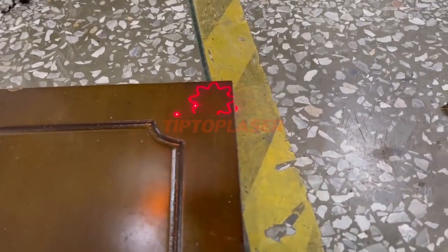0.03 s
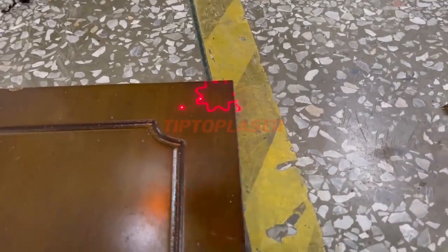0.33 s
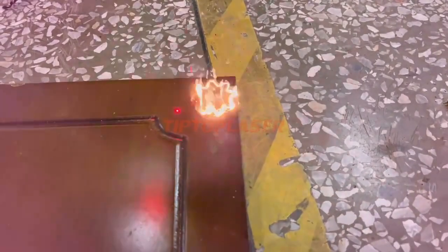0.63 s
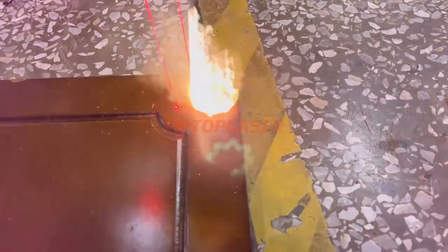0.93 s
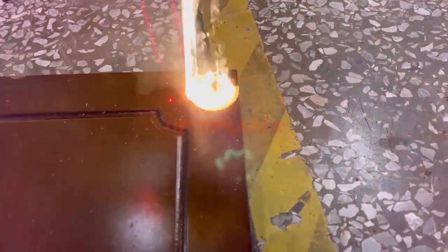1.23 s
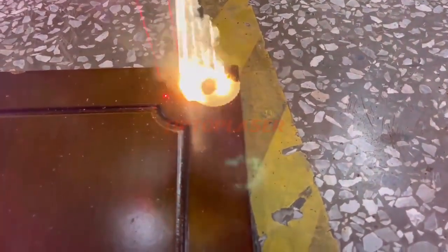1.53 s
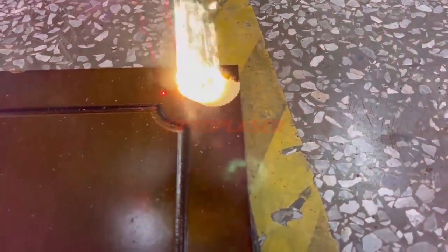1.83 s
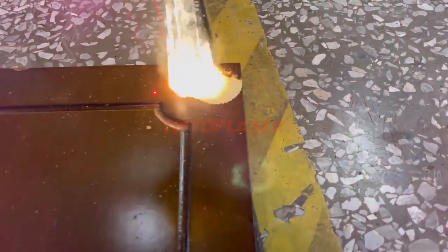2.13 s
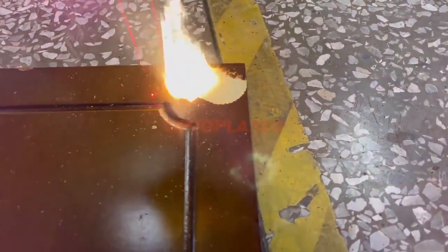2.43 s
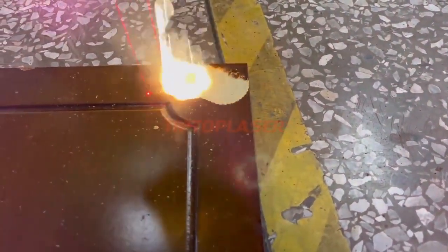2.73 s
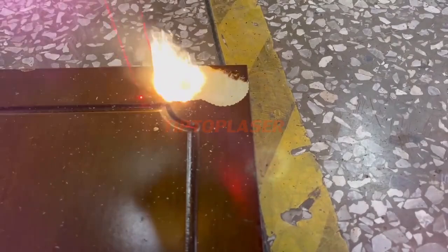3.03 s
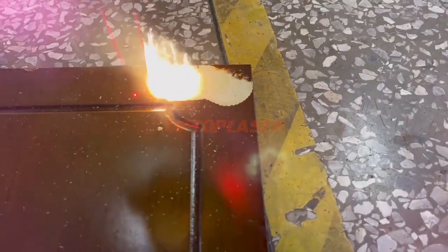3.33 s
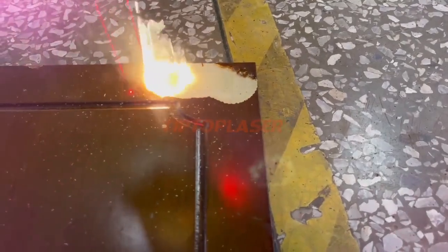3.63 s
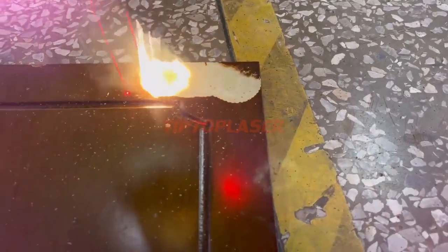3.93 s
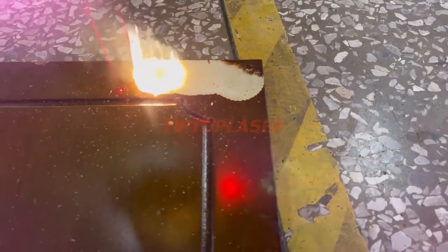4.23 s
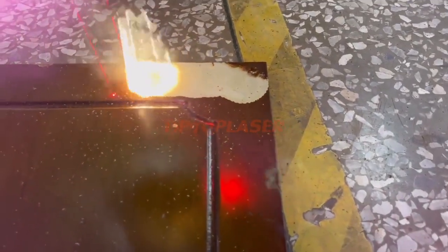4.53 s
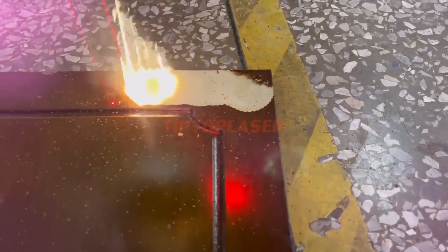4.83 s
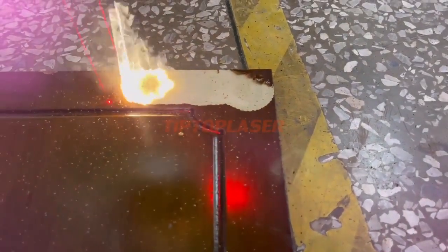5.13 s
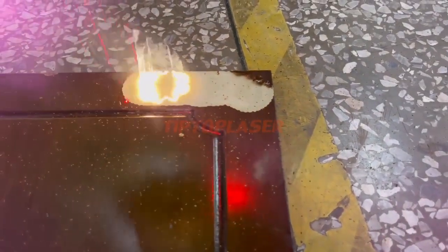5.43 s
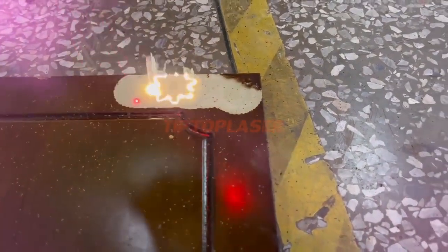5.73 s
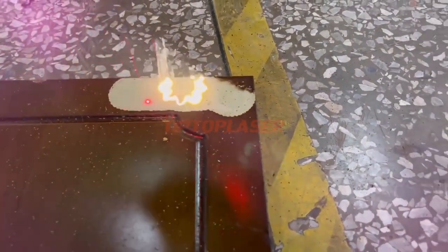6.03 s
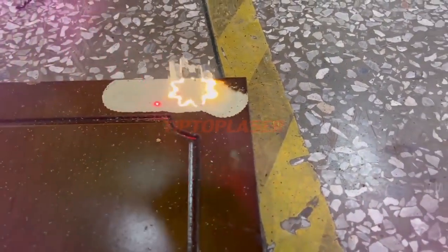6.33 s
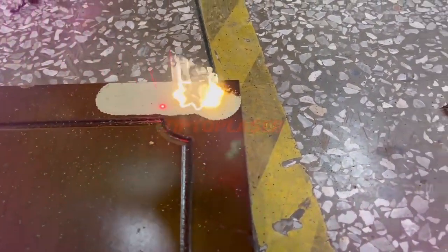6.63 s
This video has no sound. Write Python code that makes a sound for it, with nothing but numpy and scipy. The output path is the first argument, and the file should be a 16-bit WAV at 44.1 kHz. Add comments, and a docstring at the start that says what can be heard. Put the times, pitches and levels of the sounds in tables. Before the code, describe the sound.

For the first three quarters of a second, workshop fans drone with a low hum and a faint, high whine from a laser cleaning machine. At about 0.75 seconds the beam fires with a sharp crack and a low thump, and the paint on a wooden board flares into a loud, throbbing roar, heard from close by. A harsh sizzle runs with it, both pulsing so fast that they buzz. At about 1.25 seconds the flare collapses with a second thump and the roar settles lower. From 2 to 5 seconds the flame keeps weakening while the sizzle turns thinner, with wavering, buzzy tones in it. The flame is out by about 5.6 seconds. A quieter buzzing hiss continues to the end, near 6.7 seconds, dotted with small dry snaps and ticks of paint bursting on the wood, over a very faint room drone.

```python
"""A pulsed laser strips paint from a wooden board on a workshop floor, heard from close by.
First the scanner mirrors whine over the room's drone. At 0.75 s the beam fires with a crack, and the
thick paint flares up with a roar, then caves in with a thump half a second later. The spot races round
a toothed ring, so the roar and sizzle buzz at the lap rate; both thin out as the paint wears away.
By about 5.6 s the flame is out, and small snaps and ticks ring the nearly bare wood."""
import sys
import numpy as np
from scipy import signal
from scipy.fft import rfft, irfft
from scipy.io import wavfile

SR = 44100
rng = np.random.default_rng(int(sys.argv[2]) if len(sys.argv) > 2 else 0)


def wav_record(signal):
    """Record a signal, one row per channel, as 16-bit PCM in the file named by sys.argv[1]."""
    frames = np.transpose(np.atleast_2d(signal))
    bounded = np.clip(frames, -1, 1)
    # unit amplitude maps onto the largest positive 16-bit level
    quanta = np.round(bounded * 32767).astype(np.int16)
    wavfile.write(sys.argv[1], SR, quanta)


N = 294588
T, HZ = np.arange(N) / SR, np.fft.rfftfreq(N, 1 / SR)
FIRE_S = .7535
LAPS, LAP_HZ, FIGURE_HZ = 4, 91.2, 22.126  # one "figure" is four laps of the ring and a short pause
TEETH, TOOTH_AT, EDGE_AT = 7, .64, .44  # where a tooth and the paint's edge lie, in laps
FLARE_DB, FLARE_THROB_DB, FLARE_END_S, FLARE_FALL_S = -13, -18.5, 1.245, 0.025

# What lies under the moving spot: time_s, coat (0 thick paint, 1 thin paint, 2 bare wood)
COAT_UNDER_SPOT = [(2.0, 0.026), (2.25, 0.27), (2.35, 0.26), (2.65, 0.53), (2.87, 0.73), (3.1, 0.73),
                   (3.5, 0.86), (4.5, 0.91), (4.9, 1.06), (5.35, 1.64), (5.68, 1.7), (5.88, 2.05),
                   (6.38, 2.3), (6.6, 1.97)]
# Tone colour of the sizzle on each coat: pitch_hz, thick_db, thin_db, bare_db
SIZZLE_COLOUR = [(30, -90, -94, -104), (90, -67.5, -91, -93), (199, -60, -76.5, -83),
                 (330, -68, -79, -86.5), (587, -61.5, -76, -92), (930, -66.5, -75, -77),
                 (1089, -65, -77.5, -79.5), (1290, -65, -68.5, -81), (2060, -64.5, -73, -80.5),
                 (2530, -66, -81.5, -88), (3180, -65.5, -78.5, -81.5), (3500, -68, -79.5, -83.5),
                 (3960, -69, -75, -79), (5000, -73, -74.5, -80), (5450, -72.5, -96.5, -76.5),
                 (7860, -74, -75, -86), (8020, -73.5, -68, -78.5), (11340, -77.5, -73, -84),
                 (13800, -93, -95, -80), (14340, -76, -71, -72.5)]
# Sizzle strength as the beam bites more or less deeply: time_s, gain_db
BITE_DEPTH = [(.95, 3), (1.88, 0.9), (2.02, 2.5), (2.25, 2), (2.36, 0.2), (2.7, 1.5), (2.87, -1),
              (3.4, -1.67), (4.68, -1.5), (5.1, -0.8), (5.35, 1.5), (5.95, -1), (6.6, -1.5)]
# Tones at multiples of the figure rate, mostly from crossing the ring's teeth; the rows at 8 and 12 are
# overtones of the flame's once-a-lap throb: multiple_of_figure_rate, thick_db, thin_db, bare_db
TOOTH_OVERTONES = [(8, -70, -56, -78), (12, -70, -56, -78), (28, -53, -64, -85), (33, -66, -55.5, -76),
                   (37, -51, -60, -67), (41, -56, -55, -56), (49, -58, -63, -67), (62, -56, -51, -66),
                   (66, -46, -55, -70), (70, -50, -53, -70), (78, -54, -57, -69), (82, -55, -58, -65),
                   (95, -53, -61, -75), (144, -55, -63, -73), (181, -62, -64, -68), (190, -59, -62, -68)]
# How much of the noise comes round again with the spot: pitch_hz, share (0 to 1)
REPEATING_SHARE = [(100, 0.62), (700, 0.84), (1500, 0.6), (2800, 0.4), (5000, 0.15), (8500, 0)]
# Tone colour of the flame's roar: pitch_hz, gain_db
ROAR_COLOUR = [(25, -9), (45, -5.5), (65, 6.5), (88, 5.5), (120, 3.5), (165, -2.5), (260, -1.5),
               (350, -0.5), (480, -3), (650, -6.5), (900, -13), (1300, -50)]
# Overtones of the flame's puffs: multiple_of_figure_rate, gain_db
PUFF_OVERTONES = [(3, -22), (5, -13), (8, -3), (12, -7.5), (16, -12.5), (20, -18), (24, -18), (28, -21),
                  (32, -24)]
# The flame's throb after the flare: time_s, level_db
THROB_LEVEL = [(1.32, -37), (1.68, -22), (1.73, -29.5), (2.03, -42), (2.1, -31), (2.48, -30), (2.54, -48),
               (2.69, -39), (3.22, -48), (3.28, -44), (3.9, -41), (3.98, -52), (4.05, -41), (4.93, -49.5),
               (5.35, -47), (5.4, -51)]
# Thumps as the vapour lights and the flare caves in: start_s, level_db, decay_s, pitch_hz, width_hz
THUMPS = [(0.758, -7, 0.022, 130, 220), (1.26, -9.5, 0.013, 480, 200)]
# Cracks as the beam first bites: start_s, level_db, decay_s, treble_cutoff_hz
FIRST_CRACKS = [(0.7286, -17.5, 0.00033, 5000), (0.7541, -15, 0.0028, 12000), (0.7582, -4, 0.0007, 4500),
                (0.7661, -14.5, 0.0039, 4500)]
# Snaps at the edge of the paint: time_s, level_db
SNAP_LEVEL = [(5.2, -60), (5.4, -48), (6.2, -48), (6.33, -57), (6.5, -37.5), (6.68, -42)]
# Specks of paint bursting on the wood: start_s, level_db
PAINT_SPECKS = [(5.644, -31), (5.735, -23), (6.0388, -26.5), (6.1651, -28), (6.188, -28), (6.244, -24.5),
                (6.435, -26.5), (6.4808, -26.5), (6.639, -24.5)]
# Notes the board rings at: pitch_hz, level_db, ring_s (time to fade by 60 dB)
BOARD_NOTES = [(914, -11, 0.081), (1350, -8, 0.049), (1740, 1.5, 0.014), (4110, -4, 0.012)]
# Left microphone's level over the right's: pitch_hz, thick_paint_db, later_db
MIC_BALANCE = [(80, 0, -0.6), (497, -4.5, -1.5), (700, -8.5, 0), (900, -18, -5), (1190, -3.5, -2),
               (1610, -3, -0.3), (2620, -4.5, -2.5), (3630, -7, -4.5), (5400, -1, -1), (7500, 0, 0)]
# How far the left microphone's wave runs ahead: pitch_hz, lead_radians
MIC_LEAD = [(50, -0.25), (170, -0.5), (500, -0.55), (740, -0.6), (1050, 1.3), (1500, 0.24), (2200, 0),
            (3000, -1.33), (4900, -1.1), (5300, -3), (6800, -3.5), (7750, 0), (10300, 0), (11300, 3.5),
            (13550, 2.5), (14100, 1.1), (15200, 1)]
# How alike the two sides are: pitch_hz, thick_paint_likeness, later_likeness (both 0 to 1)
MIC_LIKENESS = [(100, .99, .98), (350, .97, .8), (650, .95, .88), (920, .75, .45), (1400, .89, .92),
                (2000, .9, .92), (2500, .85, .65), (4500, .66, .68), (8500, .97, .97), (15000, .75, .75)]
# Tone colour of the fans' drone: pitch_hz, level_db
FAN_COLOUR = [(25, -85), (45, -56.5), (100, -58), (125, -62.5), (220, -58), (330, -67), (430, -62.5),
              (600, -70.5), (1000, -78.5), (2000, -81.5), (4000, -90.5), (8800, -102), (11000, -116),
              (16000, -128)]
# Humming tones in the room: pitch_hz, level_db
HUM_TONES = [(49, -45), (91.5, -38), (226, -42.5), (867, -59), (1739, -61.5)]
# The background sinks once the beam fires and partly returns near the end: time_s, gain_db
BACKGROUND_LEVEL = [(0, 1), (.75, 1), (.85, -36), (5.2, -31), (5.8, -21.5), (6.68, -19)]


def sizzle(swing_db=(4.0, 1.7, 2.0), sputter_db=(1.7, 1.3, 1.7), echo=(.05, .2, .3),
           surge_db=1.13, hiss_sputter_db=2.5, split_hz=6000, echo_s=.00119):
    """Paint blasts off: a rasp swings each lap under a steadier hiss. Triples give one value a coat."""
    coat = np.clip(curve(COAT_UNDER_SPOT), 0, 2)
    coat_mix = np.maximum(1 - abs(coat - np.arange(3)[:, None]), 0)
    source = scanned_noise()
    rasp_db = np.dot(swing_db, coat_mix) * lap_swing(teeth=0.56)
    rasp_db += np.dot(sputter_db, coat_mix) * sputter() + surge_db * drift(9)
    rasp = source * evened(gain_of(rasp_db))
    hiss = source * evened(gain_of(lap_swing(spit=2.4) + hiss_sputter_db * sputter()))
    lows = 1 / (1 + (HZ / split_hz) ** 4)
    burn = filtered(rasp, lows) + filtered(hiss, 1 - lows)
    colours = gain_of(spectrum(SIZZLE_COLOUR)) * np.sqrt(SR / 2)
    sound = (coat_mix * filtered(burn, colours)).sum(0)
    # a nearby surface adds a quick echo, stronger as the flame dies down
    sound += np.dot(echo, coat_mix) * filtered(sound, lows * np.exp(-2j * np.pi * HZ * echo_s))
    return (sound + tooth_tones(coat_mix)) * gain_of(curve(BITE_DEPTH)) * beam_on()


def tooth_tones(coat_mix, waver_db=2.0, wander_radians=0.54):
    """Crossing the ring's teeth makes tones, joined by low overtones of the flame's throb; all waver as the
    hand moves the spot."""
    tones = np.zeros(N)
    for multiple, *levels_db in TOOTH_OVERTONES:
        level = np.dot(gain_of(levels_db), coat_mix) * gain_of(waver_db * drift(7.2))
        tones += level * np.sin(2 * np.pi * multiple * FIGURE_HZ * T + wander_radians * drift(13))
    return np.sqrt(2) * tones


def beam_on(delay_s=0., rise_s=0.0044):
    """Rises from 0 to 1 when the beam comes on."""
    return np.clip((T - FIRE_S - delay_s) / rise_s, 0, 1)


def spot_position():
    """Where the spot is, in laps: it counts up to four, pauses and starts again."""
    return np.minimum((T * FIGURE_HZ - .03) % 1 * LAP_HZ / FIGURE_HZ, LAPS)


def lap_swing(hottest_at=0.81, teeth=0., spit=0., spit_at=0.72, spit_width=0.044, sharpness=3.4):
    """The burn is strongest over fresh paint, flicks at each tooth and spits at one edge."""
    lap = spot_position()
    fresh_paint = np.tanh(sharpness * np.cos(2 * np.pi * (lap - hottest_at)))
    flicks = teeth * np.cos(2 * np.pi * TEETH * (lap - TOOTH_AT))
    spits = spit * np.exp(-((lap % 1 - spit_at) / spit_width) ** 2)
    return fresh_paint + flicks + spits


def scanned_noise(lap_memory=0.48, figure_memory=0.863):
    """Noise that partly repeats, because the spot keeps crossing the same paint."""
    share = np.clip(spectrum(REPEATING_SHARE), 0, 1)
    return noise(np.sqrt(1 - share + share * comb(LAP_HZ, lap_memory) * comb(FIGURE_HZ, figure_memory)))


def sputter(slowest_hz=90, fastest_hz=420):
    """The burn flutters as the same rough patches come round again and again."""
    band = bass_cut(slowest_hz) / (1 + (HZ / fastest_hz) ** 4)
    return evened(noise(band * np.sqrt(comb(LAP_HZ, 0.4) * comb(FIGURE_HZ, 0.92))))


def flame(burn_db=-30.5, afterburn_db=11, settle_s=0.39, per_coat_db=-17.5, out_s=5.36, fade_s=0.21):
    """Thick paint flares and caves in; the flame settles, weakens with the paint and goes out."""
    flare = 1 - np.clip((T - FLARE_END_S) / FLARE_FALL_S, 0, 1)
    settling_db = afterburn_db * np.exp(-np.maximum(T - FLARE_END_S, 0) / settle_s)
    steady_db = burn_db + settling_db + per_coat_db * curve(COAT_UNDER_SPOT)
    level_db = flare * FLARE_DB + (1 - flare) * steady_db
    lap_angle = 2 * np.pi * (LAPS * FIGURE_HZ * T - .17)
    sound = gain_of(level_db) * (roar() + puffs(lap_angle, level_db)) + throb(lap_angle, flare)
    alight = 1 - np.clip((T - out_s) / fade_s, 0, 1)
    return sound * beam_on(delay_s=0.00073, rise_s=0.002) * alight


def roar(gain_db=-2.0, swing_db=2.5, grow_s=0.081, deep_hz=110):
    """The flame gusts once a lap; its deepest rumble comes in as it grows."""
    gusts = scanned_noise(lap_memory=0.4, figure_memory=0.7)
    gusts *= evened(gain_of(swing_db * lap_swing(hottest_at=0.9)))
    sound = evened(filtered(gusts, gain_of(spectrum(ROAR_COLOUR))))
    rumble = filtered(sound, 1 / (1 + (HZ / deep_hz) ** 8))
    return gain_of(gain_db) * (sound - (1 - beam_on(rise_s=grow_s)) * rumble)


def puffs(lap_angle, flame_db, gain_db=-1.4, growth=0.57, flutter_db=1.9, lag_radians=0.057):
    """The flame's quick puffs make a buzz that stands out most during the flare."""
    buzz = -np.sqrt(2) * sum(gain_of(db) * np.cos(k / LAPS * lap_angle - lag_radians * (k / LAPS) ** 2)
                             for k, db in PUFF_OVERTONES)
    buzz_db = gain_db + growth * (flame_db - FLARE_DB) + flutter_db * drift(38)
    return buzz * gain_of(buzz_db) * beam_on(rise_s=0.057)


def throb(lap_angle, flare, gain_db=-0.5, overtone=0.083):
    """The flame swells once a lap, making a low, slightly unsteady note."""
    angle = lap_angle + 0.35 * drift(5.7)
    note = -np.sqrt(2) * (np.cos(angle) + overtone * np.cos(2 * angle))
    level_db = flare * FLARE_THROB_DB + (1 - flare) * curve(THROB_LEVEL)
    return note * gain_of(level_db + gain_db) * beam_on(rise_s=0.25)


def vapour_thumps(bass_hz=70, rise_share=0.12):
    """Puffs of burning vapour: low noise that swells quickly and dies away."""
    sound = np.zeros(N)
    for start_s, db, decay_s, pitch_hz, width_hz in THUMPS:
        swell = burst(start_s, decay_s) - burst(start_s, decay_s * rise_share)
        sound += gain_of(db) * swell * evened(noise(band_around(pitch_hz, width_hz) * bass_cut(bass_hz)))
    return sound


def vapour_cracks(ring_db=-22, ring_s=0.013, bass_hz=500):
    """Vapour cracks as the beam first bites, and the surroundings ring briefly."""
    sound = np.zeros(N)
    for start_s, db, decay_s, treble_hz in FIRST_CRACKS:
        fade = burst(start_s, decay_s) + gain_of(ring_db) * burst(start_s, ring_s)
        sound += gain_of(db) * fade * evened(noise(bass_cut(bass_hz) / np.hypot(1, HZ / treble_hz)))
    return sound


def crackle(spread_db=3, bright_hz=3200):
    """Once wood shows, the paint's edge snaps every lap; loose specks burst with a brighter tick."""
    at_edge = np.diff(np.floor(spot_position() - EDGE_AT), prepend=0) > 0
    wood_shows = curve(COAT_UNDER_SPOT) > 1
    snaps = at_edge * wood_shows * gain_of(curve(SNAP_LEVEL) + spread_db * rng.standard_normal(N))
    specks = sum(gain_of(db) * (np.arange(N) == round(start_s * SR)) for start_s, db in PAINT_SPECKS)
    return board(snaps + filtered(specks, bass_cut(bright_hz)))


def board(clicks, tick_db=-9, tick_s=0.00054):
    """Each click gives a dry tick and rings the wooden board."""
    t = T[:SR // 10]
    ring = sum(gain_of(db - 60 * t / ring_s) * np.sin(2 * np.pi * hz * t)
               for hz, db, ring_s in BOARD_NOTES)
    tick = gain_of(tick_db) * np.exp(-t / tick_s) * rng.standard_normal(len(t))
    return signal.oaconvolve(clicks, ring + tick)[:N]


def microphones(sound, scatter_s=.035):
    """Two microphones hear the spot, each with its own level and timing, plus the room's echoes."""
    tail = rng.standard_normal(N) * np.exp(-T / scatter_s)
    direct = rfft(sound)
    scatter = rfft(signal.fftconvolve(sound, tail / np.linalg.norm(tail))[:N])
    sides = np.array([[1], [-1]])  # left, right
    lead = np.exp(.5j * sides * spectrum(MIC_LEAD))
    pairs = []
    for balance_db, likeness in zip(spectrum(MIC_BALANCE), spectrum(MIC_LIKENESS)):
        blend = direct * np.sqrt(1 + likeness) + sides * scatter * np.sqrt(1 - likeness)
        pairs.append(irfft(blend * lead / np.sqrt(1 + gain_of(-2 * sides * balance_db)), N))
    over_thick_paint, later = pairs
    moved = np.clip(curve(COAT_UNDER_SPOT), 0, 1)
    return ((1 - moved) * over_thick_paint + moved * later) * (T > FIRE_S / 2)


def workshop(wide_hz=600, waver_db=2.0, whine_hz=9980, whine_db=-59):
    """Fans drone, with their bass in the centre; the mains hums and the scanner mirrors whine."""
    colour = gain_of(spectrum(FAN_COLOUR)) * np.sqrt(SR / 2)
    side_share = 0.48 / (1 + (wide_hz / (HZ + 1)) ** 2)
    centre = noise(colour * np.sqrt(1 - side_share))
    side = noise(colour * np.sqrt(side_share))
    for hz, db in HUM_TONES:
        level = np.sqrt(2) * gain_of(db + waver_db * drift(6.7))
        centre += level * np.sin(2 * np.pi * hz * T + .5 * drift(2.3))
    centre += gain_of(whine_db) * evened(noise(band_around(whine_hz, width_hz=230)))
    return np.array([centre + side, centre - side]) * gain_of(curve(BACKGROUND_LEVEL))


def gain_of(db):
    """Turns decibels into a number to multiply by."""
    return 10 ** (np.asarray(db) / 20)


def evened(x):
    """Scales a signal to an average power of 1."""
    return x / np.sqrt(np.mean(x ** 2) + 1e-20)


def curve(rows):
    """Joins a table's points in time with straight lines."""
    return np.interp(T, *np.transpose(rows))


def spectrum(rows):
    """Fills in a table's columns for every frequency."""
    pitch_hz, *columns = np.transpose(rows)
    return np.squeeze([np.interp(np.log(HZ + 1), np.log(pitch_hz), column) for column in columns])


def filtered(x, gain):
    """Turns each frequency up or down by its gain."""
    return irfft(rfft(x) * gain, N)


def noise(colour):
    """Noise with the given gain at each frequency."""
    return filtered(rng.standard_normal(N), colour)


def bass_cut(hz):
    """Gains that weaken everything below a pitch."""
    return HZ / np.hypot(HZ, hz)


def band_around(pitch_hz, width_hz):
    """Gains that keep only what is near a pitch."""
    return np.exp(-.5 * ((HZ - pitch_hz) / width_hz) ** 2)


def comb(hz, memory):
    """Peaks of power at multiples of a repeat rate; more memory makes them sharper."""
    return (1 - memory ** 2) / (1 + memory ** 2 - 2 * memory * np.cos(2 * np.pi * HZ / hz))


def drift(hz, points=5000):
    """A random wobble, up to about the given rate."""
    return evened(np.interp(2 * hz * T, np.arange(points), rng.standard_normal(points)))


def burst(start_s, decay_s):
    """A level that jumps to 1 and dies away."""
    return (T >= start_s) * np.exp(-np.maximum(T - start_s, 0) / decay_s)


def scene():
    """The burning spot in the workshop."""
    spot = sizzle() + flame() + vapour_thumps() + vapour_cracks() + crackle()
    return microphones(spot) + workshop()


def record(dry):
    """Rounds off the loudest peaks and cuts the highest treble."""
    rounded = dry / (1 + (dry / .95) ** 8) ** (1 / 8)
    treble_cut = signal.firwin(801, cutoff=15680, window=("kaiser", 9), fs=SR)
    return signal.oaconvolve(rounded, treble_cut[None], "same")


dry = scene()
out = record(dry)
wav_record(out)
```